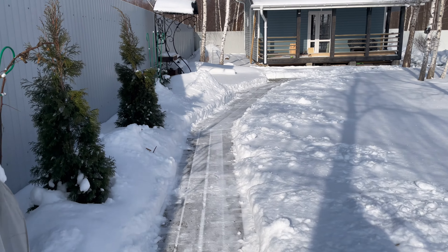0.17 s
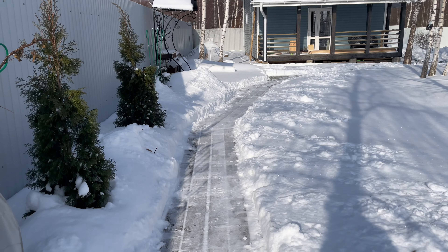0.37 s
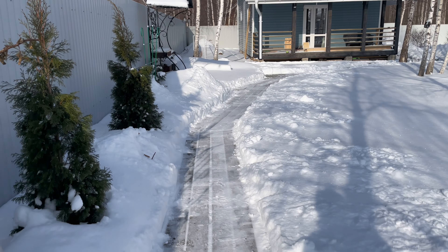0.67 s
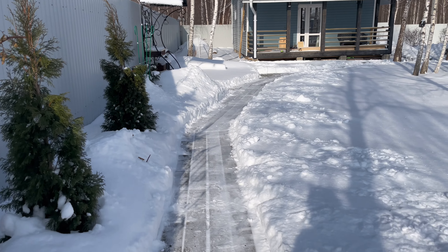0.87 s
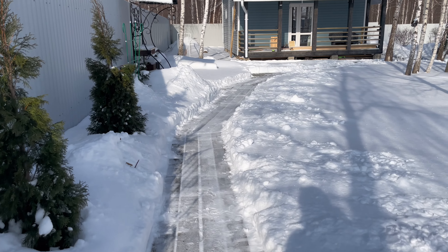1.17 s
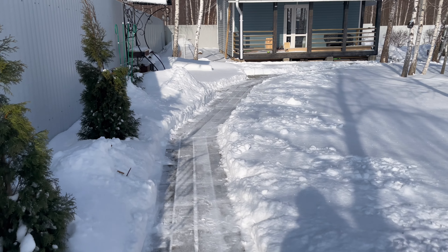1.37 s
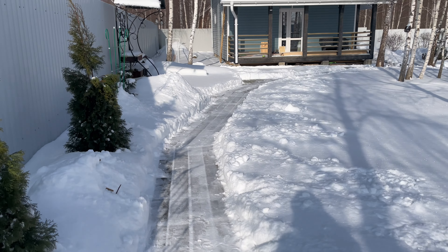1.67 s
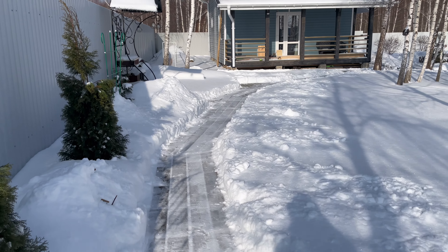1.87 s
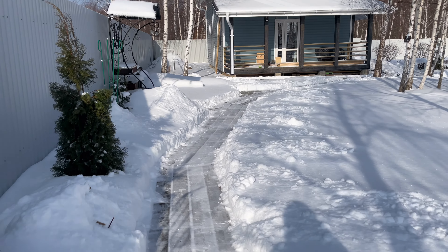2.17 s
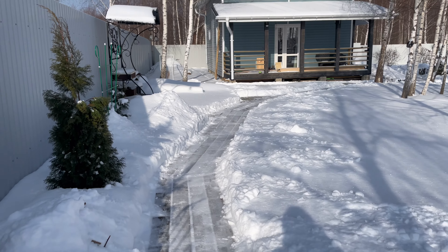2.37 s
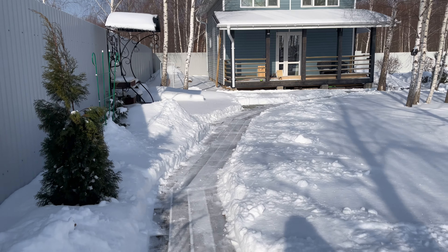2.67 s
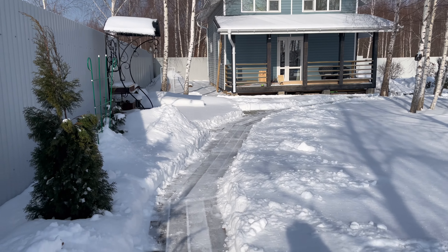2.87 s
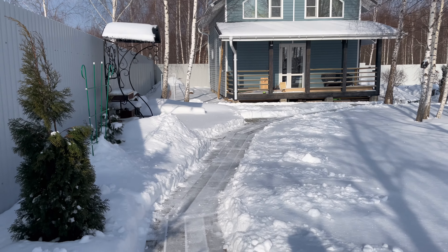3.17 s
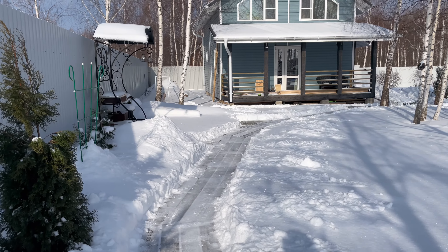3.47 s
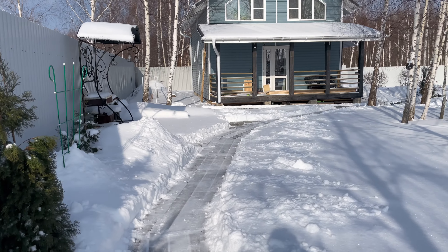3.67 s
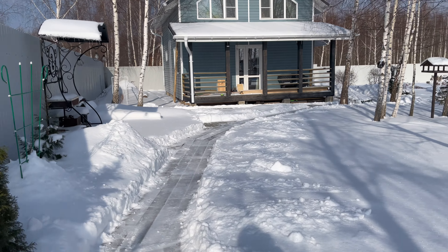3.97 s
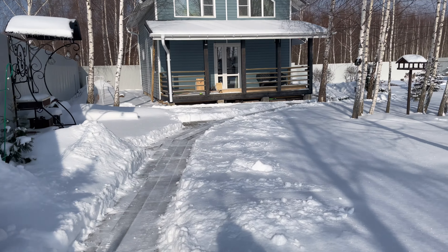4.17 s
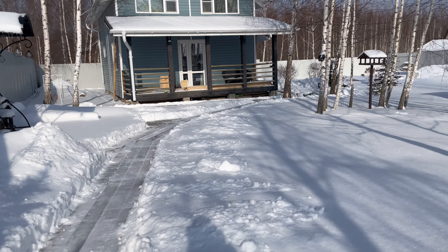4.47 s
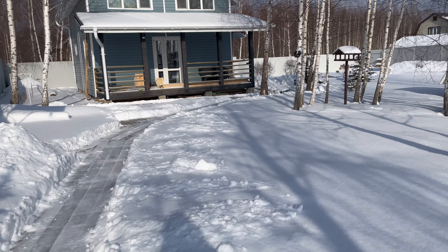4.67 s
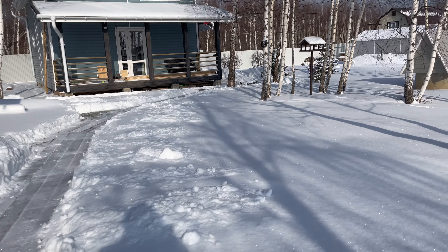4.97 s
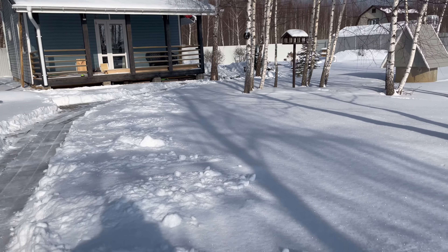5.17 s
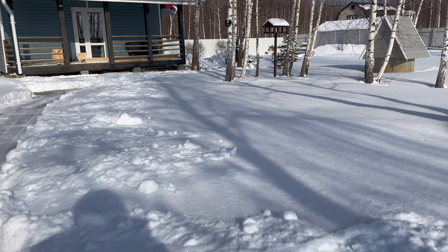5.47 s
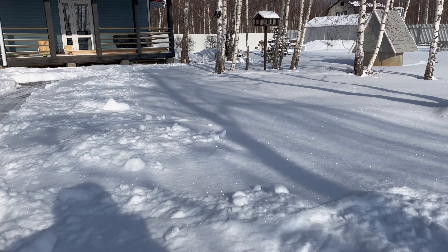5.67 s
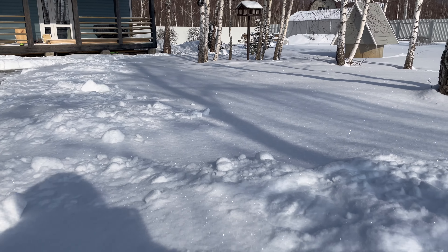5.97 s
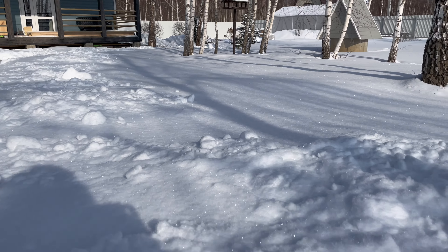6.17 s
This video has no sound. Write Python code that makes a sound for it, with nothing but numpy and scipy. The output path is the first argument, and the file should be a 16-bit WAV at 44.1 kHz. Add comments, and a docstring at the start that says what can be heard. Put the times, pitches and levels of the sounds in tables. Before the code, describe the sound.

Close, dry snow footsteps heard from a microphone held by the walker: gritty crushing, short creaks, woody crust snaps and soft sliding powder. The first full step is the loudest and deepest. A short, violent wind rumble then overwhelms the microphone before two seconds. Afterwards the steps continue at an unhurried, slightly quickening then slowing pace, with faint low bumps and quiet open air.

```python
"""Footsteps on dry, frozen snow: eight landings after the tail of a first; between them soles roll, scuff or brush.
Grain clicks in clumps make the crush and the loose powder; slip-driven resonances make squeaks and knocks.
Short gritty pulses pop; the crust snaps as dispersed pulses that chirp downward, and booms as band noise.
Wind on the hand-held microphone is shaped noise, with gusts early on; thumps are dispersed low pulses.
Table levels are relative: trims and port colour follow."""
import sys
import numpy as np
from scipy import signal
from scipy.fft import rfft, irfft
from scipy.io import wavfile
from scipy.ndimage import uniform_filter1d

SR = 44100
rng = np.random.default_rng(int(sys.argv[2]) if len(sys.argv) > 2 else 0)


def pcm_store(signal):
    """Save signal as 16-bit PCM."""
    levels = np.round(np.clip(np.atleast_2d(signal), -1, 1) * 32767)
    wavfile.write(sys.argv[1], SR, levels.astype(np.int16).T)


N = 279108
TIME = np.arange(N) / SR
EARLY_S = 0.004  # room for grit and splinters ahead of a break
# knots per second of the squeak's drift and the boom's throb
UNEVEN_PER_S = 23


def amp(db):
    """Decibels to gain."""
    return 10 ** (np.asarray(db) / 20)


def unit(x):
    """Scales to an rms of 1."""
    return x / np.sqrt(np.mean(x ** 2) + 1e-20)


def steady(x):
    """Evens out slow chance swells of a noise, to a running rms of about 1."""
    return x / np.sqrt(abs(uniform_filter1d(x ** 2, size=2000)) + 1e-20)


def read(points, hz, axis=1):
    """One column of a spectrum table, on a log-frequency axis."""
    points = np.array(points)
    return np.interp(np.log(hz + 1), np.log(points[:, 0] + 1), points[:, axis])


def curve(rows, axis=1):
    """One column of a time table, at every sample."""
    rows = np.array(rows)
    return np.interp(TIME, rows[:, 0], rows[:, axis])


def bins(x):
    """Bin frequencies of a sound's spectrum, Hz."""
    return np.fft.rfftfreq(x.shape[-1], 1 / SR)


def shaped(x, response):
    """Filters by a response given at each bin."""
    return irfft(rfft(x) * response, x.shape[-1])


def coloured(x, spectrum):
    """Filters by a spectrum table, then sets the rms to 1."""
    return unit(shaped(x, amp(read(spectrum, bins(x)))))


def hump(hz, centre_hz, octaves):
    """Bell-shaped band on a log-frequency axis."""
    return np.exp(-.5 * (np.log2((hz + 1) / centre_hz) / octaves) ** 2)


def wander(per_s):
    """Random curve: per_s normal knots a second, joined by straight lines."""
    knots = rng.standard_normal(round(per_s * N / SR) + 2)
    return np.interp(TIME * per_s, np.arange(len(knots)), knots)


def swell(at_s, rise_s, hold_s, release_s, db):
    """Gain that climbs to db at at_s, holds, dies away; rise and release are per 20 dB."""
    away = np.maximum(at_s - TIME, 0) / rise_s + np.maximum(TIME - at_s - hold_s, 0) / release_s
    return amp(db - 20 * np.minimum(away, 10))


def together(gains):
    """Power sum of gains, in dB."""
    return 10 * np.log10(sum(gain ** 2 for gain in gains))


def add(mix, at_s, sound):
    """Places a stereo sound in the mix."""
    part = mix[:, max(round(at_s * SR), 0):][:, :sound.shape[1]]
    part += sound[:, :part.shape[1]]


def bending(hz, lag_s):
    """Bending-wave dispersion: treble first, bass later; lag_s is roughly the delay at 1 kHz."""
    delay_s = lag_s * 1000 / (hz + 50)
    return np.exp(-2j * np.pi * np.cumsum(delay_s) * hz[1])


# boot landings: t/s of full weight, rise/s, hold/s, release/s, grain level/dB, powder level/dB
STEPS = [(-0.03, 0.077, 0.025, 0.082, -49, -38.5), (0.425, 0.079, 0.075, 0.29, -31.5, -45.5),
         (1.241, 0.082, 0.098, 0.22, -37, -46.5), (2.045, 0.15, 0.041, 0.4, -34.5, -45),
         (2.84, 0.15, 0.022, 0.22, -37.5, -46), (3.6, 0.2, 0.053, 0.28, -38.5, -44),
         (4.28, 0.078, 0.17, 0.22, -39, -47.5), (4.85, 0.077, 0.12, 0.12, -39.5, -40.5),
         (5.79, 0.12, 0.062, 0.19, -41.5, -44.5)]
# soles rolling, scuffing or brushing the powder between landings:
# t/s of the height, rise/s, release/s, grain level/dB, powder level/dB
BETWEEN = [(0.811, 0.27, 0.29, -41.5, -53), (1.119, 0.42, 0.39, -45.5, -59), (1.57, 0.16, 0.43, -44.5, -78),
           (1.881, 0.73, 0.48, -43, -57), (2.45, 0.27, 0.67, -43, -53.5), (2.73, 0.15, 0.23, -43.5, -48),
           (3.038, 0.073, 0.24, -43, -56.5), (3.42, 0.31, 1, -44.5, -58), (3.981, 0.17, 1, -46.5, -54),
           (4.701, 0.42, 0.36, -42, -52.5), (5.135, 0.073, 0.26, -48.5, -57.5),
           (5.335, 0.038, 0.27, -49.5, -51.5), (5.48, 0.28, 1, -63, -53.5), (6.009, 0.12, 0.57, -42.5, -48)]


def tread():
    """Landings and the moves between them set the levels of crushed grains and sliding powder, dB."""
    moves = STEPS + [(at_s, rise_s, 0, *rest) for at_s, rise_s, *rest in BETWEEN]
    crush_db = together(swell(*shape, db) for *shape, db, _ in moves)
    powder_db = together(swell(*shape, db) for *shape, _, db in moves)
    return crush_db, powder_db


def load(crush_db):
    """Share of body weight on the snow, 0 to 1."""
    return np.clip((crush_db + 46) / 10, 0, 1)


def grains(per_s, spread_db, decay_s, tint, clump_db, count=20, size=1024):
    """Ice grains click at random in clumps; each of count families has its own pitch and dispersion."""
    t, out = np.arange(size) / SR, np.zeros((2, N))
    hz = bins(t)
    for _ in range(count):
        clumps_db = np.minimum(clump_db * wander(40), clump_db)
        # where spread_db > 0, most grains are small and a few large
        sizes_db = spread_db * np.minimum(rng.exponential(1, N), 3.6)
        clicks = amp(sizes_db + clumps_db) * (rng.random(N) < per_s / count / SR)
        burst = rng.standard_normal((2, size)) * np.exp(-t / decay_s)
        pitch = 1 + tint * hump(hz, 1400 * 2 ** rng.normal(0, 0.591), 0.054)
        grain = unit(shaped(burst, pitch * bending(hz, rng.uniform(0.000473, 0.0014))))
        out += signal.oaconvolve(clicks[None], grain, axes=1)[:, :N]
    return out


# grain spectra under full weight, under light load, and of loose powder: f/Hz, level/dB
CRUSH = [(60, -28), (170, 13.5), (780, 7), (1300, 2.5), (2700, -1), (4000, -10), (14000, -21.5)]
CREAK = [(60, -49), (170, -7), (650, -0.5), (1400, -7.5), (2000, -1.5), (3000, -6), (14000, -35)]
POWDER = [(800, 2), (2000, 3), (3200, -3), (7000, 2.5), (9500, -8.5), (13000, -10.5)]
# stick-slip of the sole: knots per second, depth
BURSTS_PER_S, BURST_DB = 170, 4.2


def boots(crush_db, powder_db):
    """Light load creaks in sparse grains; full weight crushes more of them, deeper; powder slides."""
    weight = load(crush_db)
    creak = grains(per_s=600, spread_db=3.4, decay_s=0.0005, tint=5.0, clump_db=3, count=10)
    crush = grains(per_s=1300, spread_db=3.1, decay_s=0.0008, tint=4.9, clump_db=2.5, count=14)
    powder = grains(per_s=5000, spread_db=0.0, decay_s=0.00096, tint=0.36, clump_db=8.5, count=8)
    light = np.sqrt(1 - weight) * amp(-4.0) * coloured(creak, CREAK)
    heavy = np.sqrt(weight) * amp(2.5) * coloured(crush, CRUSH)
    # stick-slip breaks the grains in rapid, uneven bursts
    bursts = unit(amp(BURST_DB * np.tanh(2 * wander(BURSTS_PER_S))))
    return amp(crush_db) * bursts * (light + heavy) + amp(powder_db + 3.5) * coloured(powder, POWDER)


def slips(per_s, hz, width_hz):
    """Uneven stick-slip, paced around per_s, rings a resonance that follows the curve hz."""
    turns = np.floor(np.cumsum(per_s * 2 ** wander(per_s)) / SR)
    clicks = np.diff(turns, prepend=0) * np.clip(rng.standard_normal((2, N)), -2, 2)
    turn = np.exp(2j * np.pi * np.cumsum(hz) / SR)
    r = np.exp(-np.pi * width_hz / SR)
    # filtered in a frame that turns with the pitch
    ringing = signal.lfilter([1], [1, -2 * r, r * r], clicks / turn + 1e-18)
    return unit((turn * ringing).real)


# pitch around which the crust flexes, higher where stiffer: t/s, f/Hz
STIFFNESS = [(.45, 276), (1.0, 171), (2.3, 300), (3.3, 435), (4.6, 419), (4.78, 219), (6.0, 312)]
# squeak: pitch under a light sole, fall under full weight, drift scale
SQUEAK_HZ, SQUEAK_FALL_OCT, SQUEAK_DRIFT_OCT = 1773, 0.6, 0.18
# relative to the grain level
SQUEAK_DB, KNOCKS_DB = -6.5, -6


def packing(crush_db):
    """Packing snow squeaks, lower as load grows, and knocks on the hollow crust below."""
    drift_oct = SQUEAK_DRIFT_OCT * wander(UNEVEN_PER_S)
    squeak_hz = SQUEAK_HZ * 2 ** (drift_oct - SQUEAK_FALL_OCT * load(crush_db))
    squeak = slips(per_s=200, hz=squeak_hz, width_hz=680)
    knocks = slips(per_s=110, hz=curve(STIFFNESS), width_hz=100)
    return amp(crush_db + SQUEAK_DB) * squeak + amp(crush_db + KNOCKS_DB) * knocks


# background spectrum: f/Hz, level/dB
STILL_AIR = [(30, -19), (500, -0.5), (3000, -20.5), (7000, -17), (14000, -22)]


def still_air():
    """Faint outdoor background: steady coloured noise."""
    return amp(-56.0) * coloured(rng.standard_normal((2, N)), STILL_AIR)


# wind rumble spectrum: f/Hz, level/dB
GUST = [(15, -37), (30, -25), (55, 5), (100, 1), (200, -7.5), (300, -15.5), (700, -27.5), (4000, -77)]
# breeze on the microphone: t/s, level/dB
BREEZE = [(0, -64), (.76, -68), (0.98, -38.5), (1.4, -31), (1.9, -39), (2.35, -47), (3.2, -53), (3.45, -40),
          (3.8, -54), (5.3, -56), (6.33, -62)]
# gusts on top: t/s of full force, rise/s, hold/s, release/s, level/dB
GUSTS = [(1.434, 0.027, 0.089, 0.03, -20), (1.494, 0.025, 0.12, 0.029, -18.5),
         (1.666, 0.029, 0.027, 0.058, -21), (1.74, 0.0072, 0.033, 0.06, -21.5),
         (2.044, 0.044, 0.025, 0.073, -25.5)]


def wind():
    """Lumpy turbulence, independent noise per port; breeze rumbles, strong gusts also flutter higher up."""
    level_db = together([swell(*row) for row in GUSTS] + [amp(curve(BREEZE))])
    strength = np.clip((level_db + 28) / 14, 0, 1)
    lumps_db = (4 - 2 * strength) * np.minimum(wander(40), 1.6)
    noise = rng.standard_normal((2, N))
    rumble = steady(coloured(noise, GUST))
    flutter = steady(shaped(rng.standard_normal((2, N)), hump(bins(noise), 228, octaves=0.51)))
    return amp(level_db + lumps_db) * (amp(4.5) * rumble + amp(1.0) * strength * flutter)


# single slips of packed snow: t/s, peak level/dB
POPS = [(0.023, -26), (0.134, -31), (0.435, -15.5), (0.483, -21), (0.534, -20), (0.551, -23), (0.619, -24),
        (0.644, -26), (0.675, -26.5), (0.755, -24), (0.7831, -19), (0.838, -25.5), (0.874, -27.5),
        (0.922, -32), (2.16, -24), (2.177, -21), (2.19, -17.5), (2.2067, -20.5), (2.3586, -27),
        (2.3932, -23), (2.477, -27.5), (2.4943, -29), (2.561, -27), (3.007, -25), (3.0583, -26),
        (3.192, -26.5), (3.3606, -26), (3.781, -23), (4.083, -30.5), (4.287, -22), (4.349, -22.5),
        (4.392, -21.5), (4.708, -26), (5.8396, -28), (5.915, -30), (5.9916, -28), (6.071, -29),
        (6.1445, -31.5)]
POP_HZ = 1645  # under a light sole


def pops(crush_db, size=1024):
    """Each slip of packed snow is a short gritty pulse, lower as load grows; no crust ring."""
    out, slip = np.zeros((2, N)), signal.unit_impulse(size, round(EARLY_S * SR))
    t, hz, weight = np.arange(size) / SR - EARLY_S, bins(slip), load(crush_db)
    for at_s, peak_db in POPS:
        drift_oct = SQUEAK_DRIFT_OCT * rng.uniform(-0.62, 1)
        centre_hz = POP_HZ * 2 ** (drift_oct - SQUEAK_FALL_OCT * weight[round(at_s * SR)])
        grit = 0.15 * rng.standard_normal((2, size)) * np.exp(-abs(t) / 0.0011)
        band = hump(hz, centre_hz, octaves=0.38) + 0.11 * hump(hz, centre_hz, octaves=1.44)
        pop = shaped(slip + grit, band * bending(hz, 0.001627))
        add(out, at_s - EARLY_S, amp(peak_db) * pop / abs(pop).max())
    return out


# ring modes of the flexing crust: f/Hz, width/Hz, level/dB
FLEX = [(164.6, 42, 8.5), (257, 46, -4.5), (412, 75, 0)]


def snap(peak_db, centre_hz, flex_db, tick_db, flex_hz, size=4096):
    """One fracture amid splinters: icy tick, woody knock, then a low falling chirp and ring of the crust."""
    t = np.arange(size) / SR - EARLY_S
    hz = bins(t)
    fracture = signal.unit_impulse(size, round(EARLY_S * SR))
    splinters = rng.standard_normal((2, size)) * np.exp(np.minimum(t / 0.0014, -t / 0.0049))
    splinters /= np.linalg.norm(splinters[0])
    settling = rng.standard_normal((2, size)) * np.exp(-abs(t) / 0.0051) * (t > 0)
    settling /= np.linalg.norm(settling[0])
    # clean break: one dull pulse; ragged break: bright splinters
    ragged = amp(0.61 * (tick_db - peak_db + 18.5))
    distance = rng.uniform(0.6, 1.15)  # scales the dispersion
    path = bending(hz, 0.001592 * distance)
    breaking = fracture + ragged * (1.8 * splinters + 0.3 * settling)
    knock = shaped(breaking, hump(hz, centre_hz, octaves=0.48) * path)
    patch = 2 ** (rng.uniform(-1.44, 1) / 10)  # mode pitch varies per patch of crust
    ring = sum(amp(db) / (1 + 2j * (hz - patch * mode_hz) / width_hz) for mode_hz, width_hz, db in FLEX)
    flex_path = bending(hz, 0.002114 * distance)
    flex = shaped(fracture + 1.02 * settling, ring * hump(hz, flex_hz, octaves=0.7) * flex_path)
    chips = splinters * np.exp(-abs(t) / .0018)
    tick = shaped(0.28 * fracture + chips, hump(hz, 3200, octaves=1.3) * path)
    knock = amp(peak_db - 2.5) * knock / abs(knock).max()
    return knock + amp(flex_db - 13.0) * unit(flex) + amp(tick_db - 8.0) * unit(tick)


# loud crust snaps: t/s, knock level/dB, knock centre f/Hz, flex level/dB, tick level/dB
SNAPS = [(0.047, -26, 1440, -40, -51), (0.101, -27, 1110, -41.5, -47.5), (0.157, -22, 1310, -36.5, -47.5),
         (0.199, -43, 1960, -41, -52.5), (0.236, -31.5, 1180, -38.5, -48.5),
         (0.286, -28, 1160, -33.5, -41.5), (0.344, -28.5, 1580, -35, -46.5),
         (0.367, -21.5, 840, -27.5, -48.5), (0.406, -13.5, 1070, -28, -46), (0.476, -10.5, 900, -35, -43.5),
         (0.491, -10.5, 1000, -17, -48), (0.505, -10.5, 980, -19.5, -47), (0.519, -20, 1410, -18.5, -48),
         (0.567, -13.5, 1010, -16.5, -45.5), (0.7322, -18, 1360, -22, -44.5),
         (0.951, -29, 1450, -20.5, -48.5), (1.066, -25, 870, -20.5, -49.5), (1.146, -24, 685, -26, -50.5),
         (1.192, -26.5, 776, -16, -48.5), (1.54, -15, 1270, -21, -45.5), (1.882, -22, 1960, -52, -52),
         (1.912, -23, 2220, -36, -52), (2.272, -23.5, 980, -37, -53.5), (2.598, -23.5, 1760, -33.5, -48),
         (2.642, -28, 1740, -32.5, -51), (2.836, -17, 1060, -32, -47), (3.082, -21.5, 1370, -60, -50),
         (3.12, -23, 1540, -37, -54), (3.255, -20, 1900, -34, -51.5), (3.302, -25.5, 2270, -36, -57),
         (3.339, -25.5, 1420, -36, -54), (3.398, -22.5, 700, -29.5, -47), (3.463, -25.5, 730, -29, -50),
         (3.711, -17.5, 1130, -25, -59), (3.895, -23, 1440, -35.5, -47.5), (3.941, -37, 736, -34, -53),
         (3.986, -30, 1740, -33.5, -45.5), (4.273, -22, 1410, -30.5, -41), (4.503, -15.5, 870, -23.5, -44),
         (4.59, -12.5, 1230, -28, -45), (4.67, -22, 1300, -29.5, -42.5), (4.748, -18.5, 1360, -19.5, -42.5),
         (4.81, -21.5, 925, -24, -45), (4.864, -17.5, 1480, -23, -38.5), (5.187, -22.5, 1220, -34, -50.5),
         (5.781, -25.5, 1320, -26.5, -41), (5.881, -18, 2200, -31.5, -49),
         (5.9454, -24.5, 1260, -25.5, -43), (6.041, -25.5, 1130, -28, -41),
         (6.0925, -26, 1330, -33.5, -36.5)]


def crust():
    """Snaps of the frozen crust; splinters start just before each break."""
    out = np.zeros((2, N))
    for at_s, *row in SNAPS:
        flex_hz = np.interp(at_s, *np.transpose(STIFFNESS))
        add(out, at_s - EARLY_S, snap(*row, flex_hz))
    return out


# hollow booms where the crust gives: t/s of the height, rise/s, hold/s, release/s, level/dB
BOOMS = [(0.373, 0.014, 0.71, 0.09, -43), (0.552, 0.13, 0.053, 0.024, -30.5),
         (1.26, 0.086, 0.075, 0.083, -32), (4.345, 0.026, 0.46, 0.11, -51.5),
         (5.804, 0.14, 0.23, 0.055, -54)]
THROB_DB = -0.5  # per unit of wander


def boom():
    """Hollow low band of noise that throbs slightly and unevenly."""
    level_db = together(swell(*row) for row in BOOMS)
    throb_db = THROB_DB * np.minimum(wander(UNEVEN_PER_S), 1)
    noise = rng.standard_normal((2, N))
    hollow = steady(shaped(noise, hump(bins(noise), 154.7, octaves=0.21)))
    return amp(level_db + throb_db + 5.0) * hollow


# single microphone thumps, from an eddy or a jolt of the hand: t/s, peak level/dB, centre f/Hz
THUMPS = [(0.579, -20.5, 141), (1.309, -14, 166), (1.427, -11.5, 103), (1.509, -2.5, 222), (1.581, -3, 238),
          (1.678, -3, 133), (1.754, -14.5, 183), (1.831, -9, 364), (2.05, -20, 81.6), (2.222, -26, 85),
          (2.352, -32, 60), (2.857, -30, 105), (2.958, -32.5, 86.6), (3.334, -34, 62), (3.413, -27.5, 75),
          (3.504, -26.5, 110), (3.668, -32, 65), (4.313, -28, 77), (5.447, -36.5, 73.5),
          (5.635, -35.5, 166)]


def thumps(size=4096):
    """A push of air or a jolt reaches the left port, then the right: a soft thump, falling in pitch."""
    out, push = np.zeros((2, N)), signal.unit_impulse(size)
    hz = bins(push)
    for at_s, peak_db, centre_hz in THUMPS:
        thump = shaped(push, hump(hz, centre_hz, octaves=0.87) * bending(hz, 0.001157))
        right = amp(-7.5) * np.roll(thump, round(0.00054 * SR))
        add(out, at_s, amp(peak_db + 2.0) * np.array([thump, right]) / abs(thump).max())
    return out


# response of the two microphone ports: f/Hz, left level/dB, right level/dB
PORTS = [(457, -2.5, -2), (1290, -0.5, 2), (2480, -1.5, 1.5), (3260, 6, -4), (4460, 1.5, -9),
         (5314, 3.5, -20), (5910, -17, 4.5), (6050, 5.5, -2.5), (6880, -2, -8.5), (7540, -17.5, -7.5),
         (8040, 4.5, 2), (9430, -14.5, -9.5), (12030, 0, -1.5), (15300, -19, -17)]
# phase by which the left port leads: f/Hz, lead/rad
LEAD = [(1600, 0.54), (2670, 1.15), (3100, 1.75), (4130, 6.84), (7060, 12.2), (7900, 10.04), (10700, 2.35),
        (12300, 6.6)]
# left-right likeness: f/Hz, likeness (0 to 1)
LIKENESS = [(100, 1), (1300, 0.91), (4000, 0.8), (10500, 0.5), (12500, 1)]


def ports(pair):
    """Sound from the feet reaches the ports with different colour and phase, partly scattered."""
    hz, (direct, scattered) = bins(pair), rfft(pair)
    same = np.clip(read(LIKENESS, hz), 0, 1)
    left = direct * amp(read(PORTS, hz))
    mixed = same * direct + np.sqrt(1 - same ** 2) * scattered
    right = mixed * amp(read(PORTS, hz, axis=2)) * np.exp(-1j * read(LEAD, hz))
    return irfft(np.array([left, right]), N)


def scene():
    """Snow underfoot and still air through the ports; wind and thumps straight on the microphone."""
    crush_db, powder_db = tread()
    underfoot = boots(crush_db, powder_db) + packing(crush_db) + pops(crush_db) + crust() + boom()
    return ports(underfoot + still_air()) + wind() + thumps()


EDGE_HZ = 15800


def record(dry):
    """Clips at full scale, then band-limits at EDGE_HZ."""
    lowpass = signal.firwin(511, EDGE_HZ, window=("kaiser", 9), fs=SR)
    return signal.oaconvolve(np.clip(dry, -1, 1), lowpass[None], "same", axes=1)


dry = scene()
out = record(dry)
pcm_store(out)
```